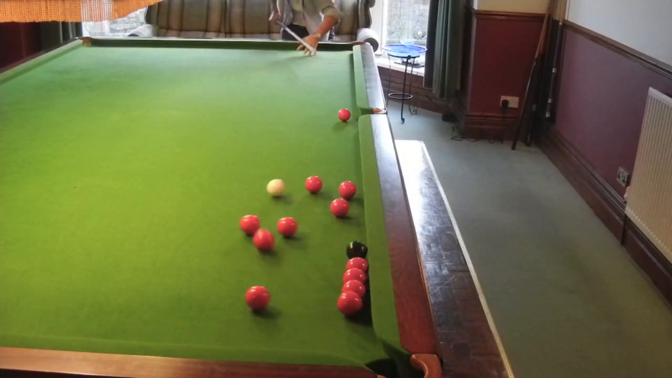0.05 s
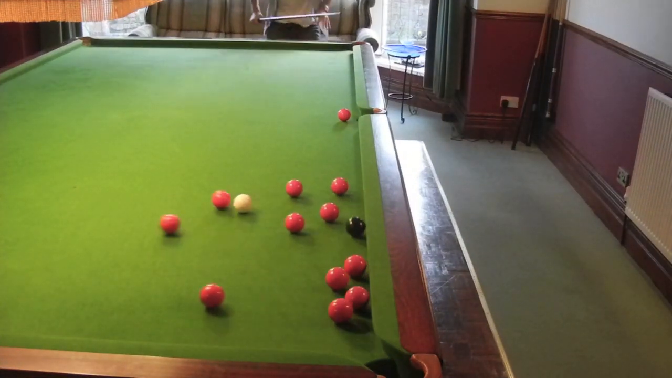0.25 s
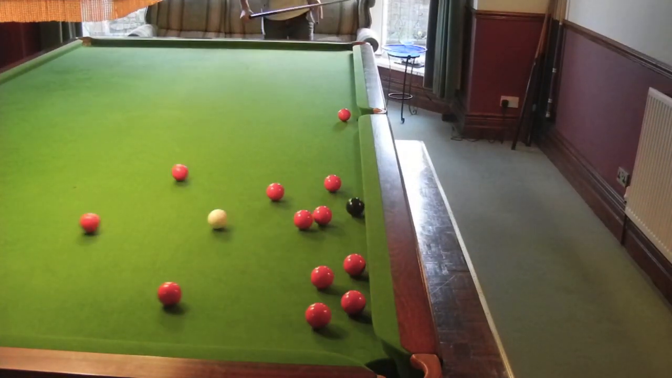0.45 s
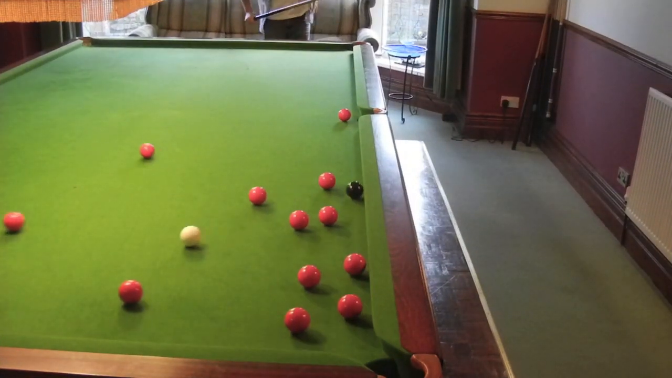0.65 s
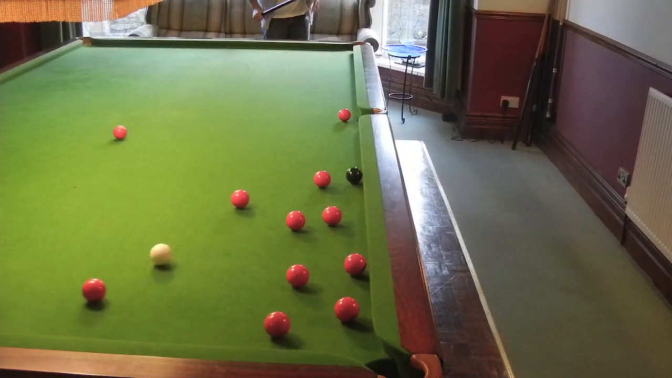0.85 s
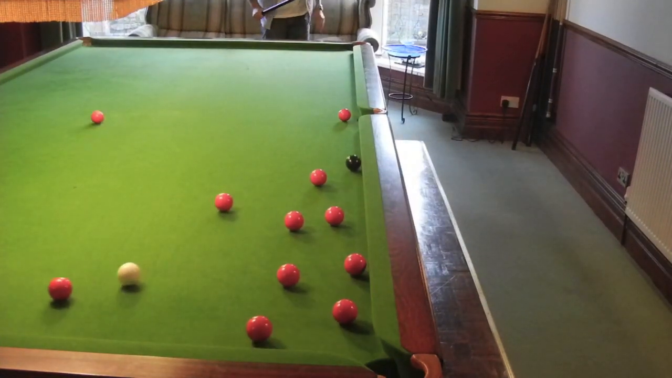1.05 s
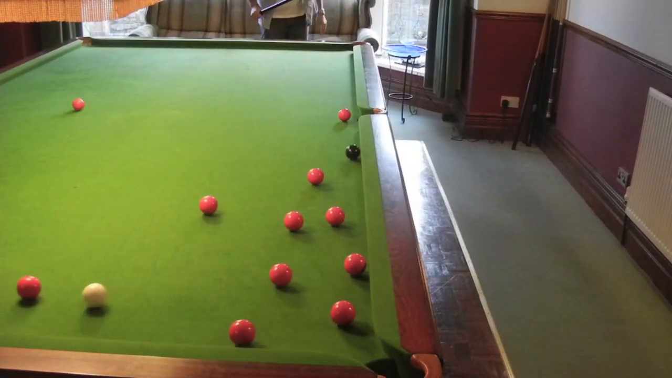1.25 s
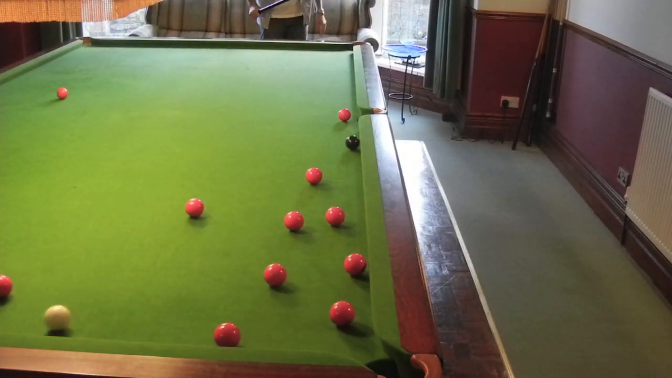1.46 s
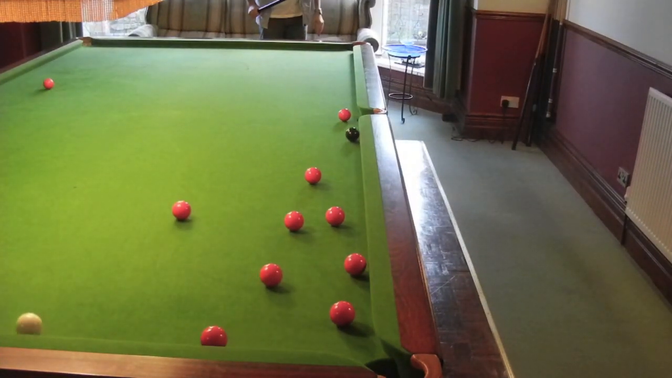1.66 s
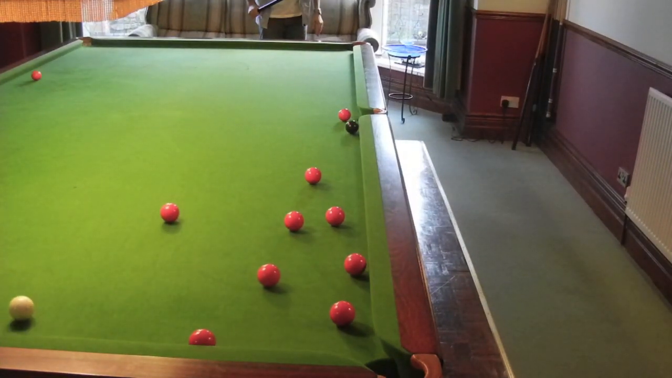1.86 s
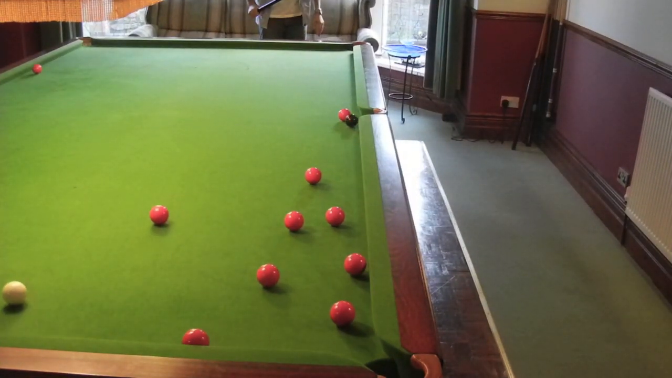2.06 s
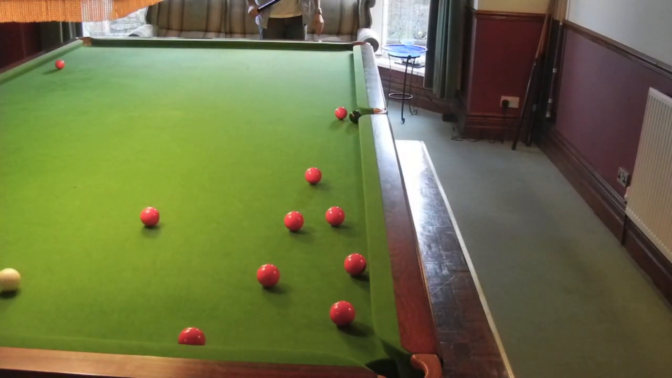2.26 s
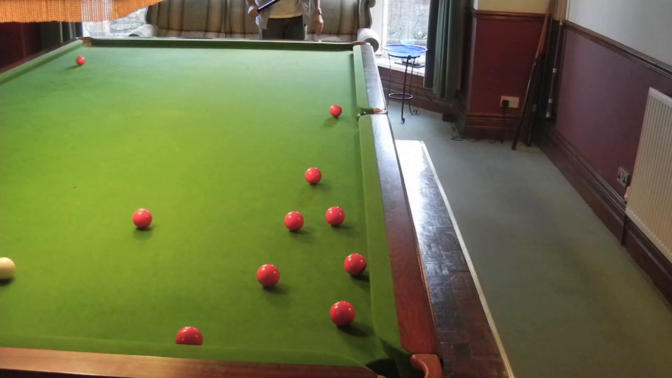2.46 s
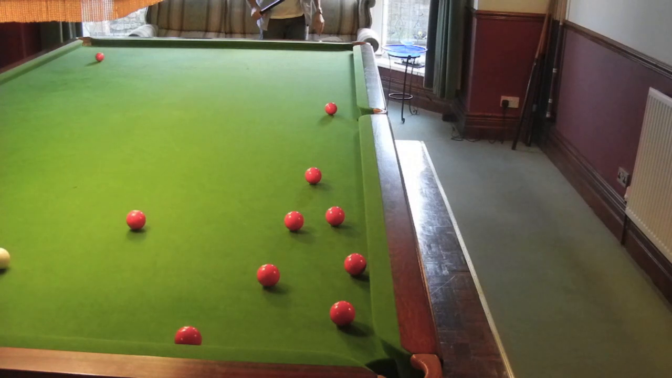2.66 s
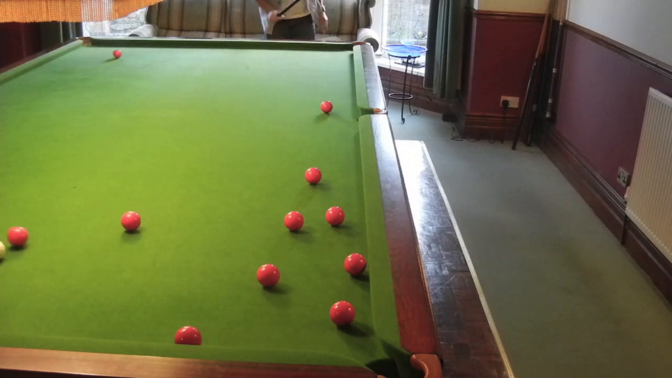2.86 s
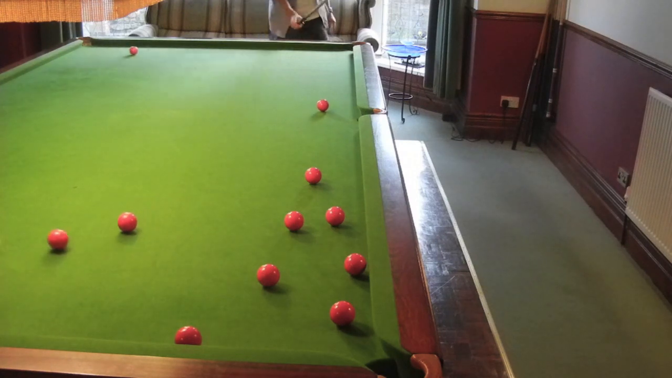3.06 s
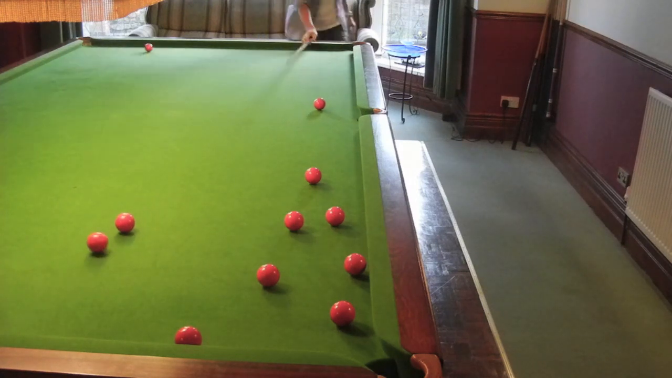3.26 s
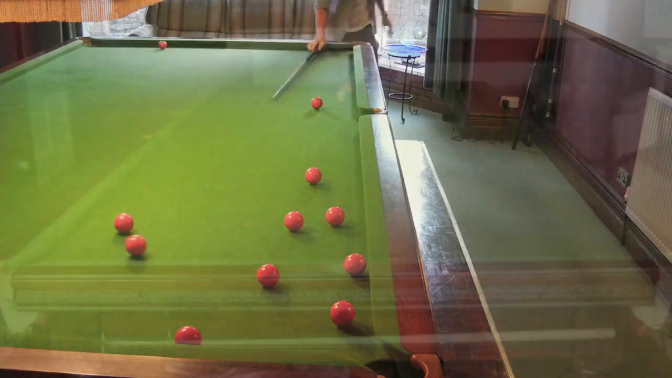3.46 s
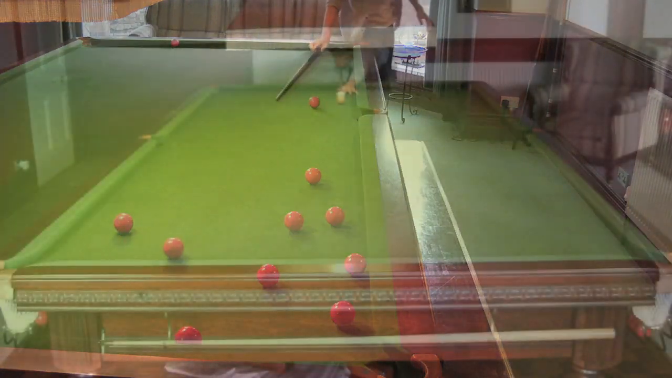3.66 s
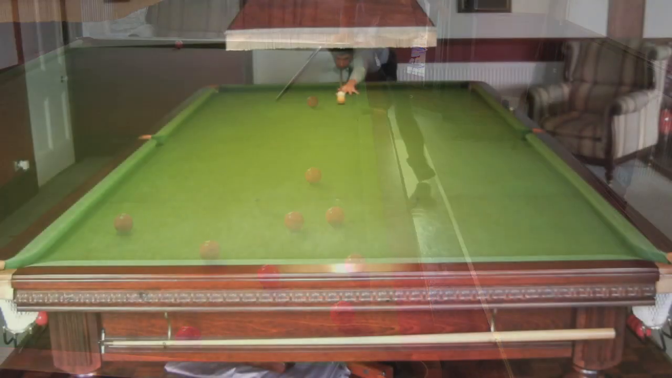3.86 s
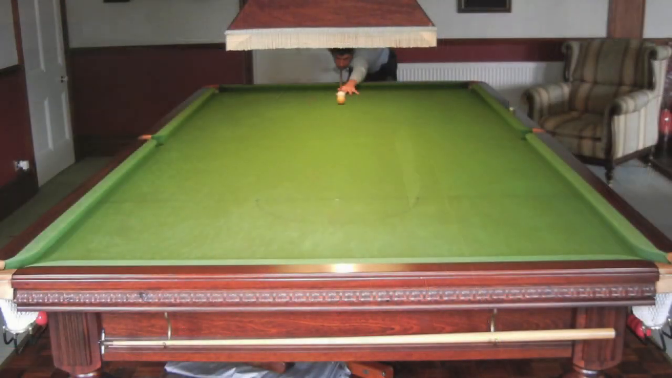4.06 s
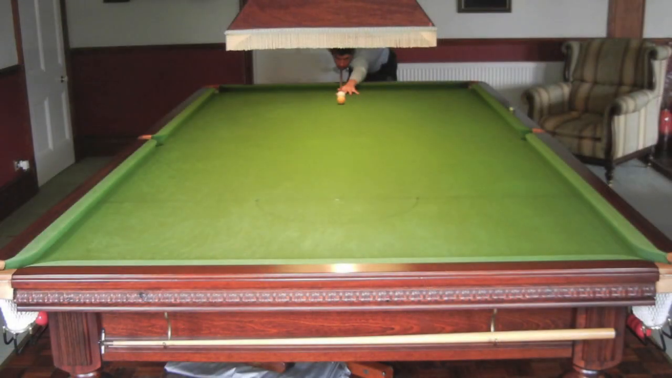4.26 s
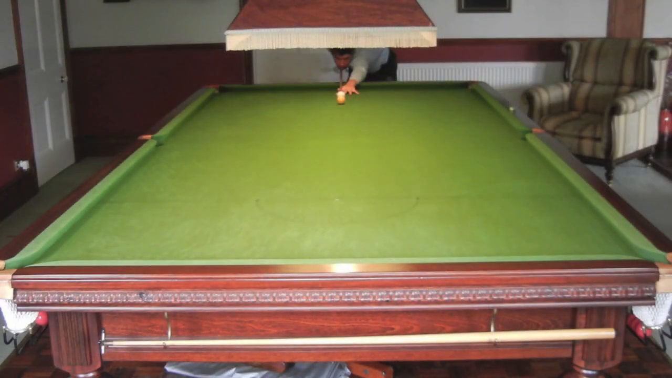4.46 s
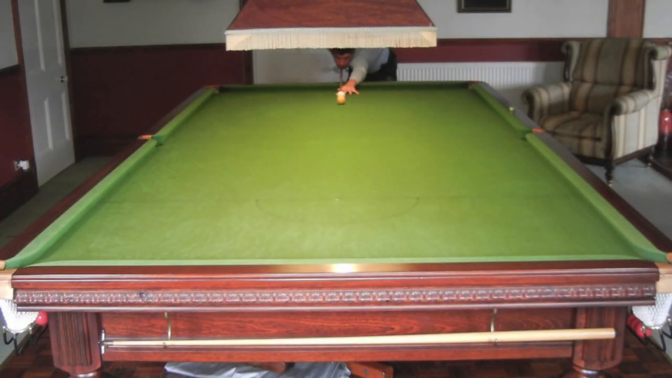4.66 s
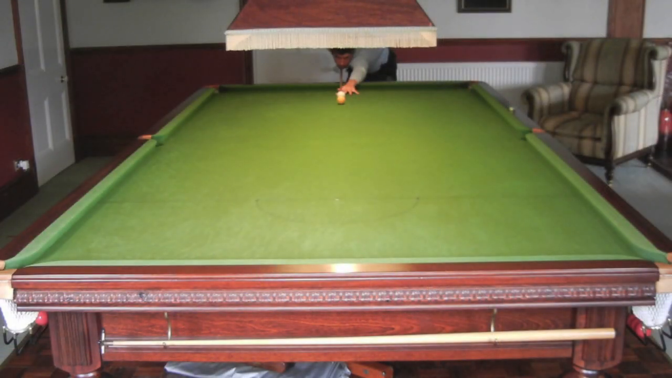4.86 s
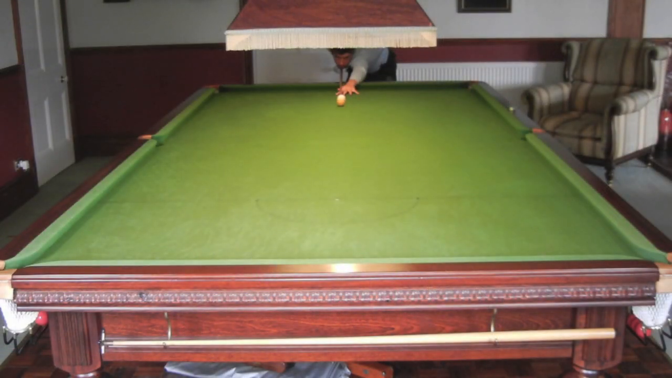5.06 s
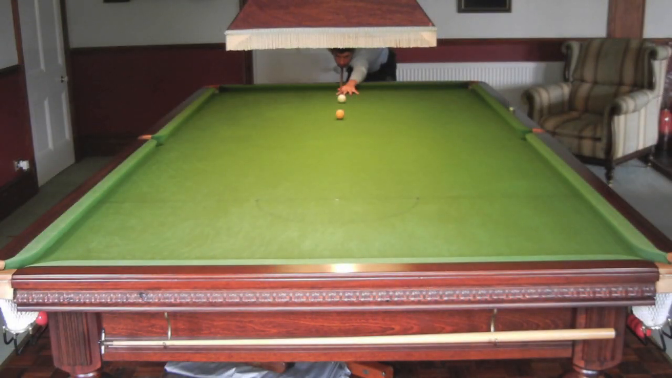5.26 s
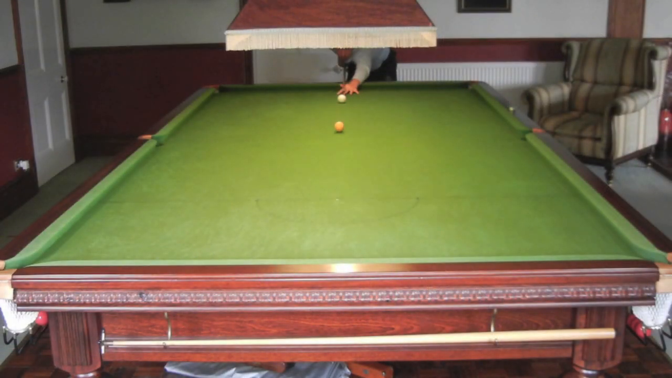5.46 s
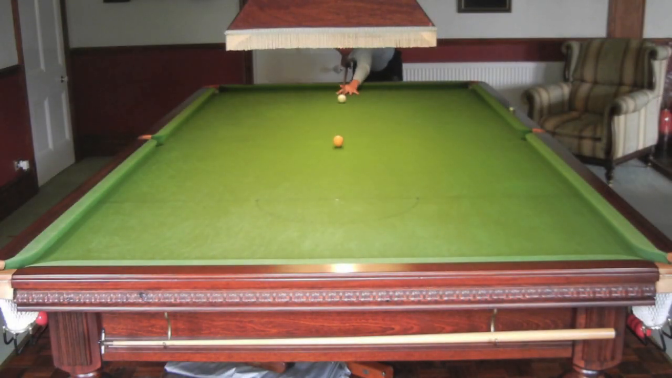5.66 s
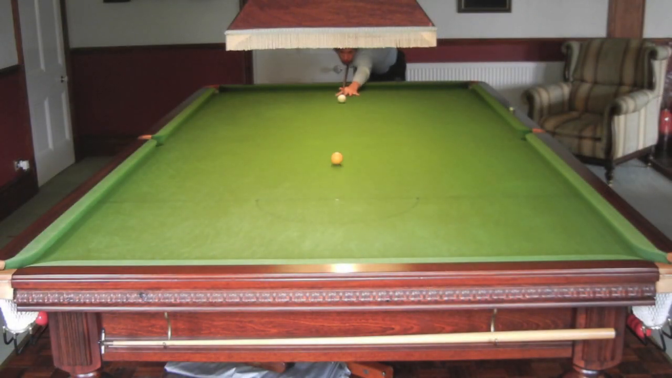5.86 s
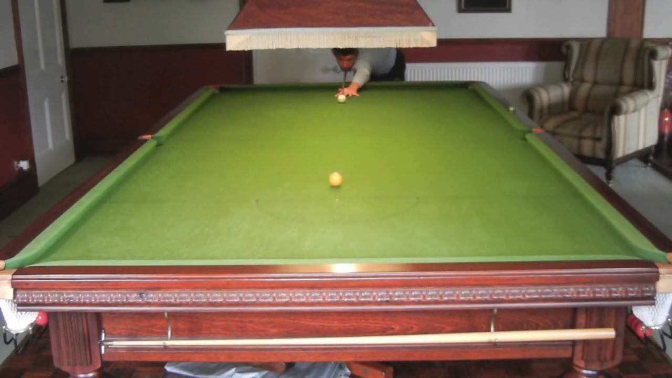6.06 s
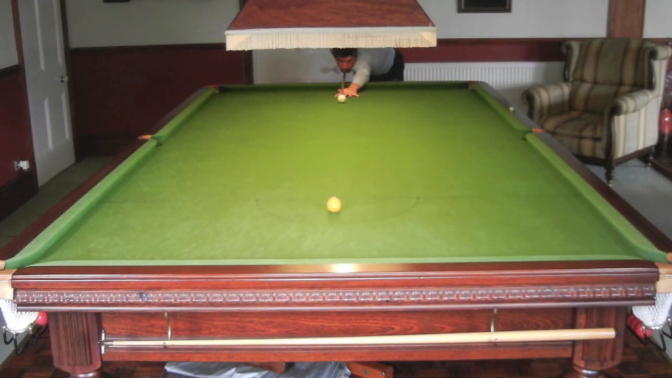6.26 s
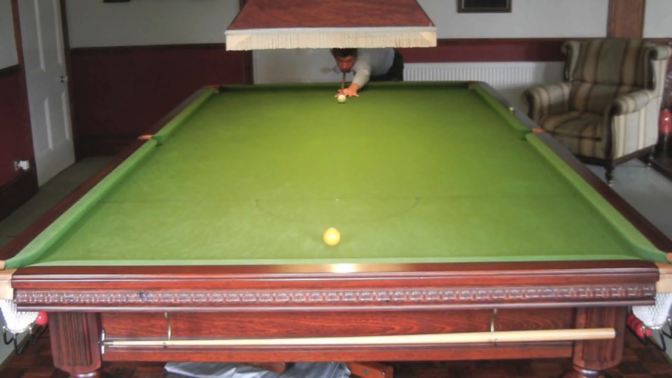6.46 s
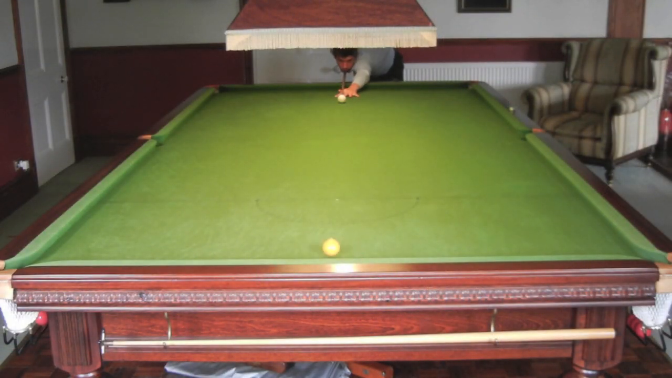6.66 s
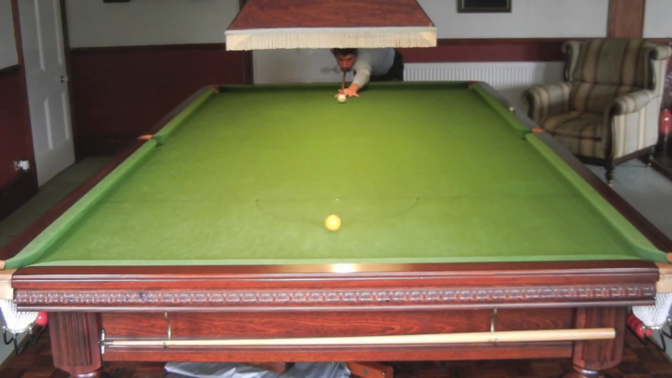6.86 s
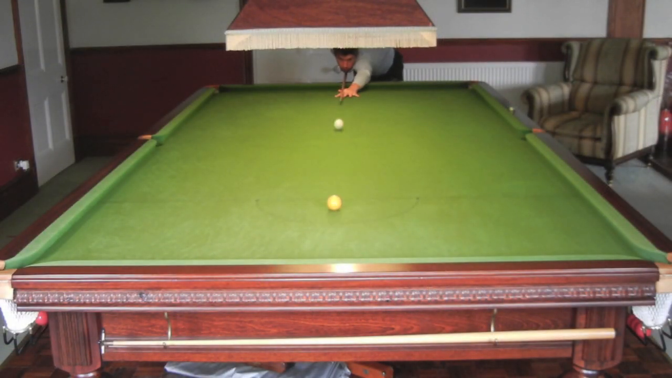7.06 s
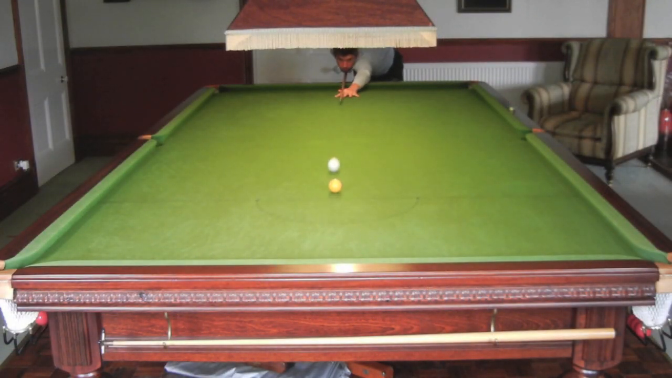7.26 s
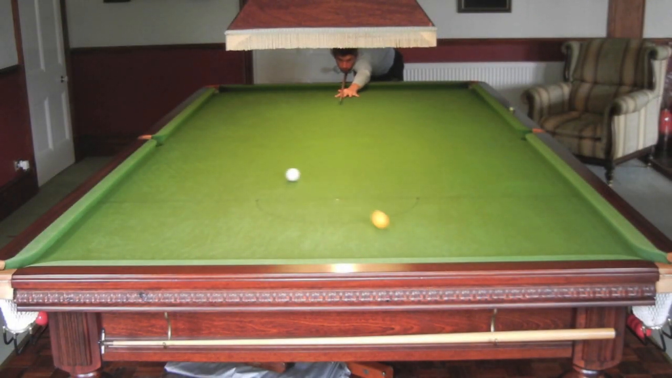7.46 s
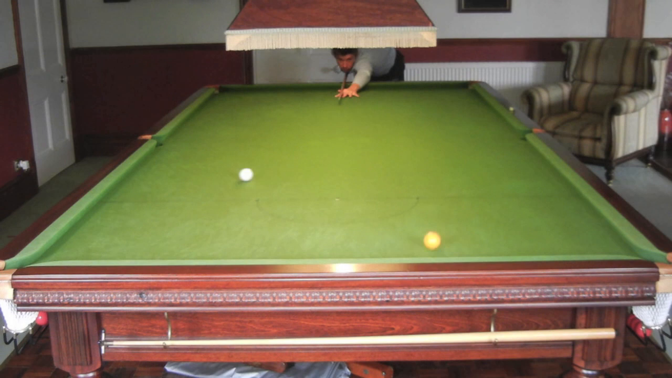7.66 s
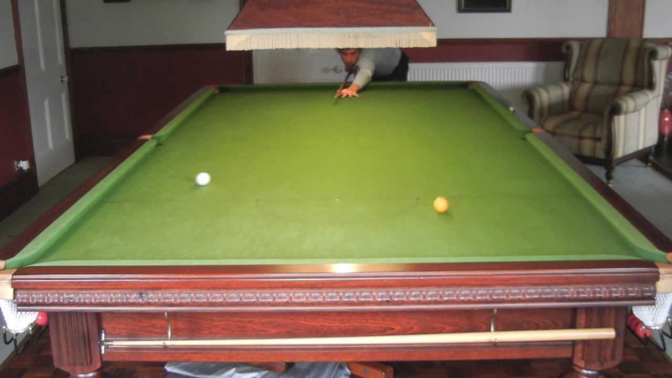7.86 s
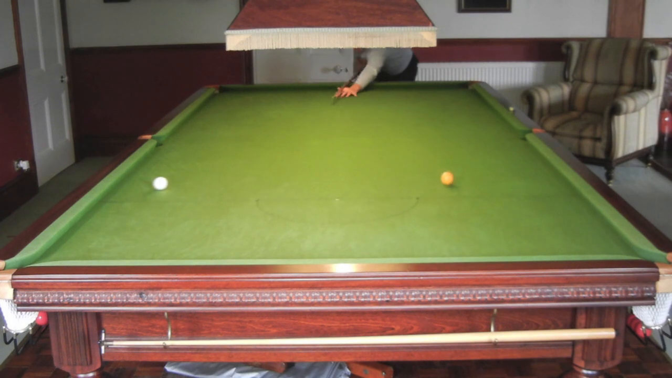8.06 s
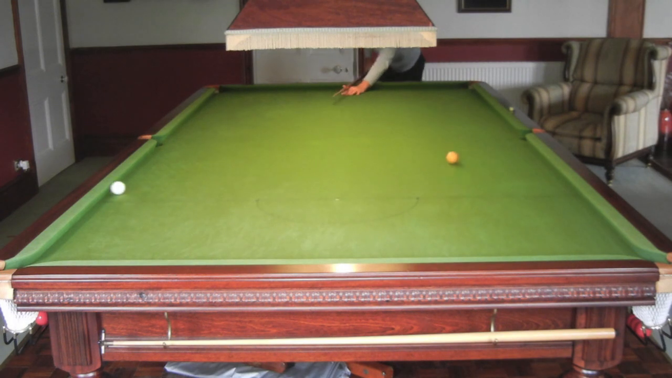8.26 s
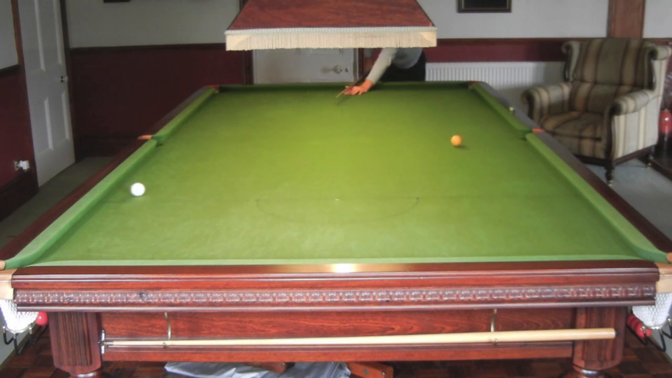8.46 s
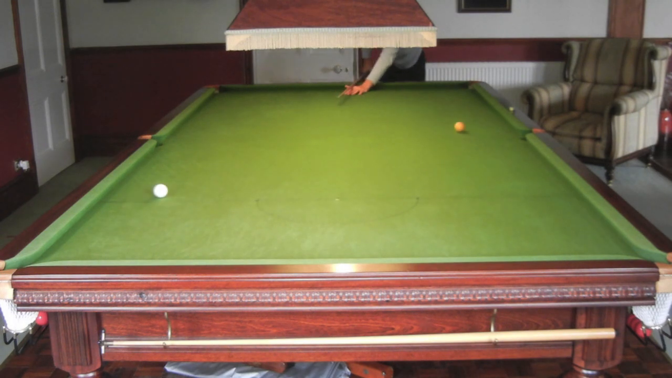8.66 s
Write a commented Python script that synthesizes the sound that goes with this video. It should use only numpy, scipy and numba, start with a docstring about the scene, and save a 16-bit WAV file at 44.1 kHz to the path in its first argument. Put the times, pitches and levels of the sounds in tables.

```python
"""Snooker balls click, roll and thump the cushions in a quiet, fairly live room; two cue shots follow.
Each contact between balls is a sub-millisecond pulse, answered by reflections from table and walls.
Rail, frame and cue shaft ring in damped modes; faint handling ticks and a wooden clack precede the shots.
The room tone passes from that beside the table to that at its end. The hardest clicks overload the
microphone, whose gain control ducks and slowly recovers."""
import sys
import numpy as np
from scipy import signal
from scipy.fft import rfft, irfft, next_fast_len
from scipy.io import wavfile
from numba import njit

SR = 44100
rng = np.random.default_rng(int(sys.argv[2]) if len(sys.argv) > 2 else 0)


def transcribe(signal):
    """Save signal, clipped to [-1, 1], as a 16-bit WAV file at the path in sys.argv[1]."""
    frames = np.atleast_2d(signal).T
    limited = np.clip(frames, -1, 1)
    pcm = np.round(limited * 32767).astype(np.int16)
    wavfile.write(sys.argv[1], SR, pcm)


N = 384552


def amp(db):
    """The decibel law: amplitude grows tenfold every 20 dB."""
    return 10 ** (np.asarray(db) / 20)


def unit_rms(x):
    """Power normalisation to rms 1."""
    return x / np.sqrt(np.mean(x ** 2) + 1e-20)


def unit_blow(x):
    """Energy normalisation to that of 10 ms at rms 1."""
    return x / np.linalg.norm(x) * np.sqrt(SR / 100)


def curve_at(points, hz):
    """Interpolation of (Hz, value) points on a logarithmic frequency axis."""
    freqs, values = np.transpose(points)
    return np.interp(np.log(hz + 1), np.log(freqs), values)


def filtered(x, response):
    """Linear filtering: the spectrum is multiplied by a frequency response."""
    size = next_fast_len(N + SR // 2)
    return irfft(rfft(x, size) * response(np.fft.rfftfreq(size, 1 / SR)), size)[..., :N]


def pulse(spectrum, bright=1, size=4096):
    """Minimum phase: the shortest causal pulse with this spectrum, its frequencies scaled by bright."""
    magnitude = amp(curve_at(spectrum, np.fft.rfftfreq(size, 1 / SR) / bright))
    cepstrum = irfft(np.log(np.maximum(magnitude, 1e-6)))
    cepstrum[1:size // 2] *= 2
    cepstrum[size // 2 + 1:] = 0
    return unit_blow(irfft(np.exp(rfft(cepstrum))))


def burst(spectrum, t60, attack, bright=1):
    """Dense modes merge into coloured noise that decays exponentially; t60 and attack are in seconds."""
    t = np.arange(SR // 2) / SR
    rattle = rng.standard_normal(len(t)) * amp(-60 * t / t60) * (1 - np.exp(-t / attack))
    return unit_blow(signal.fftconvolve(rattle, pulse(spectrum, bright))[:len(t)])


def ring(modes, attack):
    """Modal superposition: damped sinusoids (Hz, dB, t60) build up during the contact."""
    t = np.arange(SR // 2) / SR
    tones = sum(amp(db - 60 * t / t60) * np.sin(2 * np.pi * (hz * t + rng.random()))
                for hz, db, t60 in modes)
    return unit_blow(tones * (1 - np.exp(-t / attack)))


def add(track, start_s, sound):
    """Superposition of a stereo sound on the track; its start may be negative."""
    start = round(start_s * SR)
    part = sound[:, max(-start, 0):N - start]
    track[:, max(start, 0):][:, :part.shape[1]] += part


# Coherence of the noise field. Each row: frequency in Hz, left-right correlation.
COHERENCE = [(60, 0.88), (150, 0.6), (380, 0.5), (950, 0.37), (2380, 0.47), (5980, 0.19), (15000, 0.09)]

def diffuse_noise(spectrum):
    """Spatial coherence: steady noise of rms 1 whose long waves reach both microphones nearly alike."""
    def mid_side_gains(hz):
        angle = np.arccos(np.clip(curve_at(COHERENCE, hz), -1, 1)) / 2
        return amp(curve_at(spectrum, hz)) * [np.cos(angle), np.sin(angle)]
    mid, side = filtered(rng.standard_normal((2, N)), mid_side_gains)
    return unit_rms(np.array([mid + side, mid - side]))


# Decay of the room. Each row: frequency in Hz, reverberation time t60 in seconds.
REVERB_TIMES = [(100, 0.86), (200, 0.89), (500, 0.59), (1200, 0.53), (2400, 0.6), (4000, 0.47),
                (8000, 0.48), (15000, 0.073)]
# Stereo width of the tail at close-set microphones. Each row: frequency in Hz, side over mid in dB.
TAIL_WIDTH = [(250, -17), (2200, -13), (4500, -8), (10000, 1.5)]
# Reflections from cloth, rails and lamp shade. Each row: typical delay in seconds, level in dB.
REFLECTIONS = [(.0013, -17), (.003, -7.5), (.0044, -13.5), (.0066, -14.5), (.0088, -10), (0.0222, -9.5),
               (0.03, -9)]

def in_room(x, room_db, build_s=0.0059):
    """Convolution with direct sound, early reflections and a diffuse tail, drawn anew for each spot."""
    hz, t, noise = signal.stft(rng.standard_normal((2, SR)), SR, nperseg=256)
    noise[1] *= amp(curve_at(TAIL_WIDTH, hz))[:, None]
    envelope = amp(-60 * t / curve_at(REVERB_TIMES, hz)[:, None]) * (1 - np.exp(-t / build_s))
    mid, side = signal.istft(noise * envelope, SR, nperseg=256)[1]
    paths = amp(room_db) * np.array([mid + side, mid - side]) / np.linalg.norm(mid)
    paths[:, 0] += 1  # direct sound
    for delay, db in REFLECTIONS:
        arrival = round(delay * SR * np.exp(.1 * rng.standard_normal()))
        paths[[0, 1], arrival + rng.integers(0, 2, size=2)] += amp(db)  # oblique paths reach one side first
    return signal.fftconvolve(x[None], paths, axes=1)


# Balls set rolling. Each row: start in seconds, length in seconds, level in dB before rise and decay.
ROLLING_BALLS = [(-.2, .9, -42), (1.0, .9, -50.3), (1.9, 1.8, -47.3), (5.62, .5, -46), (6.95, .9, -39),
                 (8.15, .6, -49)]
# Spectrum of the rumble. Each row: frequency in Hz, relative level in dB.
RUMBLE_SPECTRUM = [(29, -52), (50, -11.5), (108, -1), (172, -13), (200, -5.5), (289, -19.5), (495, -7.5),
                   (661, -18.5), (714, -19.5), (1950, -12.5), (5000, -27.5), (6500, -43), (11000, -120)]

def rolling(rise_s=.15, friction_db_per_s=4.5, stop_s=.2):
    """Rolling friction slows the balls, so their rumble on cloth and slate sinks away."""
    envelope = np.zeros(N)
    for start, length, db in ROLLING_BALLS:
        t = np.maximum(np.arange(N) / SR - start, 0)
        stop = np.exp(-np.maximum(t - length, 0) / stop_s)
        envelope += amp(db - friction_db_per_s * t) * (1 - np.exp(-t / rise_s)) * stop
    return envelope * diffuse_noise(RUMBLE_SPECTRUM)


# Ball on ball. Each row: start in seconds, level in dB, reverberant over direct sound in dB.
COLLISIONS = [(-.02, -16, 2.5), (.0795, -11.8, -4.5), (.1105, -25, 9), (.1453, -17, 2), (.169, -24, 6),
              (.2274, -26.5, 11), (.335, -34, 11), (.566, -24.5, 2), (2.022, -55, 13.5),
              (2.2782, -18.5, -4), (5.1493, -2.5, -2), (7.4368, .5, 1.5)]
# Spectrum of a click before brightness scaling. Each row: frequency in Hz, relative level in dB.
CLICK_SPECTRUM = [(210, -46), (350, -19), (550, -22.5), (875, -12), (1290, -6), (1430, -6), (1590, -6.5),
                  (1710, -2), (2410, 0), (2830, -3), (3610, -12), (6500, -66.5), (8450, -79), (14300, -120)]

def ball_clicks(base_bright=1.03, brighter_per_db=.0055):
    """Hertzian contact: resin balls give one pulse, shorter and brighter when they meet faster."""
    out = np.zeros((2, N))
    for start, db, room_db in COLLISIONS:
        force_db = db + room_db  # the reverberant level does not depend on distance
        bright = base_bright * np.exp(brighter_per_db * force_db)
        add(out, start, in_room(amp(db) * pulse(CLICK_SPECTRUM, bright), room_db))
    return out


# Room tone and microphone hiss, beside the table and at its end.
# Each row: frequency in Hz, relative level in dB.
SIDE_AIR_SPECTRUM = [(24, -37.5), (40, -8), (92, -1), (129, -7.5), (182, 1.5), (340, -11), (500, -2),
                     (795, -5), (1010, -4.5), (5000, -18), (6500, -50.5), (11000, -120)]
SIDE_HISS_SPECTRUM = [(2650, -30), (4500, -57.5), (5300, 18), (5730, 15.5), (10500, 13), (11500, 17),
                      (14400, 10.5), (15100, 14), (15800, -6)]
END_AIR_SPECTRUM = [(24, -22), (42, -1), (80, 0), (113, -4), (157, -11), (205, -2.5), (275, -14),
                    (400, -9.5), (490, -5), (740, -10), (970, -7), (1600, -11), (2600, -10.5), (5000, -18),
                    (6500, -36), (11000, -120)]
END_HISS_SPECTRUM = [(2650, -27), (4500, -69.5), (5030, 5), (5950, 7.5), (8540, 6.5), (9790, 11),
                     (11200, 3), (14600, 4), (15800, -12.5)]

def room_tone(side_db=-54.5, side_hiss_db=-61.5, end_db=-53.2, end_hiss_db=-61.0):
    """An equal-power cross-fade carries the background noise from beside the table to its end."""
    t = np.arange(N) / SR
    angle = np.interp(t, [3.35, 4.1], [0, np.pi / 2])
    swell_db = 2.7 * np.exp(-((t - 4.35) / .28) ** 2)  # the room tone swells briefly
    beside = amp(side_db) * diffuse_noise(SIDE_AIR_SPECTRUM)
    beside += amp(side_hiss_db) * diffuse_noise(SIDE_HISS_SPECTRUM)
    at_end = amp(end_db + swell_db) * diffuse_noise(END_AIR_SPECTRUM)
    at_end += amp(end_hiss_db) * diffuse_noise(END_HISS_SPECTRUM)
    return np.cos(angle) * beside + np.sin(angle) * at_end


# Ball on cushion. Each row: start in seconds, thud, knock and boom levels in dB, pitch ratio of the spot.
REBOUNDS = [(.039, -25, -19.5, -20.5, 1.2), (.174, -43, -51, -32, .98), (.654, -42.5, -51, -47, .96),
            (1.636, -42.5, -55, -31, 1.02), (2.131, -47, -37, -34.5, .96), (2.735, -50, -47, -35.5, .9),
            (2.99, -52, -55, -41, 1.04), (3.345, -60, -49, -42.5, .89), (3.443, -45, -41, -54, 1.13),
            (3.66, -43, -52, -41.5, 1.0), (6.704, -30, -31.5, -41, 1.19), (7.713, -25.5, -25.5, -30.5, 1.2),
            (8.148, -50, -44, -61, 1.22), (8.305, -40, -30.5, -43, 1.21)]
# Spectrum of the rubber's thud. Each row: frequency in Hz, relative level in dB.
THUD_SPECTRUM = [(47, -32), (80, -6), (197, -9), (280, -7), (393, 5.5), (421, -17), (492, -4), (983, -14.5),
                 (1170, -14.5), (2300, -21), (5000, -41), (6500, -85.5), (11000, -120)]
# Modes of rail and frame. Each row: frequency in Hz at pitch ratio 1, relative level in dB, t60 in seconds.
RAIL_MODES = [(326, -2, .06), (392, 0, .07), (600, -7, .07)]
FRAME_MODES = [(132, -7, .12), (163, 0, .15), (181, -5, .12)]

def cushions():
    """Compliant rubber prolongs the impact: a dull thud, a knock in the rail, a slower boom in the frame."""
    out = np.zeros((2, N))
    for start, thud_db, knock_db, boom_db, pitch in REBOUNDS:
        at_spot = lambda modes: [(hz * pitch, db, t60) for hz, db, t60 in modes]
        thud = amp(thud_db) * burst(THUD_SPECTRUM, t60=0.13, attack=0.002)
        knock = amp(knock_db) * ring(at_spot(RAIL_MODES), attack=0.003)
        boom = amp(boom_db) * ring(at_spot(FRAME_MODES), attack=0.012)
        add(out, start, in_room(thud + boom + knock, room_db=0.4))
    return out


# Handling near the microphone. Each row: start in seconds, level in dB.
HANDLING = [(2.726, -35.5), (2.763, -37.5), (2.98, -30.5), (3.731, -41.5)]
# Spectrum of a tick. Each row: frequency in Hz, relative level in dB.
TICK_SPECTRUM = [(120, -28), (175, 3), (253, -18.5), (454, 0), (715, -2), (842, -7.5), (2210, -4),
                 (6130, -18.5), (10200, -17), (15500, -20.5)]

def handling_ticks():
    """Heavy damping cuts each light touch down to a short, bright tick."""
    out = np.zeros((2, N))
    for start, db in HANDLING:
        add(out, start, in_room(amp(db) * burst(TICK_SPECTRUM, t60=0.03, attack=0.0097), room_db=-0.5))
    return out


# Modes of knocked wood. Each row: frequency in Hz, bandwidth in Hz at damping 1, relative level in dB.
WOOD_MODES = [(557, 150, 14.5), (1072, 43, -5), (1390, 17, -8), (1567, 51, 3.5), (1864, 32, 0),
              (2284, 27, -3), (2630, 54, -3), (2750, 32, -9), (3250, 32, -24), (3480, 19, -20)]
# Spectrum of the cue's rattle, here and in the shots. Each row: frequency in Hz, relative level in dB.
CUE_SPECTRUM = [(47, -34), (90, -6), (270, -8), (461, 1.5), (930, 1), (1060, -4), (1240, -2), (1610, -5.5),
                (2230, -3), (2970, -7), (3240, -4), (3460, -25), (3780, -12.5), (4600, -18.5), (4910, -18),
                (15000, -46)]

def cue_clack(start_s=3.5415, db=-27.5, damping=1.7, rattle_db=-7):
    """Broad resonances decay fast: a light wooden knock and rattle as the player moves the cue."""
    out = np.zeros((2, N))
    modes = [(hz, level, np.log(1000) / (np.pi * width * damping)) for hz, width, level in WOOD_MODES]
    knock = ring(modes, attack=0.0019)
    rattle = amp(rattle_db) * burst(CUE_SPECTRUM, t60=0.15, attack=0.0026)
    add(out, start_s, in_room(amp(db) * (knock + rattle), room_db=-5))
    return out


# Blows of the cue. Each row: start in seconds, level in dB, ring over knock in dB,
# brightness as a frequency ratio, reverberant over direct sound in dB.
CUE_BLOWS = [(5.0965, -12.2, -7, 0.9, -5.5), (7.0052, -8.2, -9.5, 1.073, -5.5)]
# Modes of the wooden shaft. Each row: frequency in Hz, relative level in dB, t60 in seconds.
SHAFT_MODES = [(724, -9, 0.12), (1056, 1.5, 0.18), (1530, -38, 0.11), (1930, 1, 0.26), (2167, -4, 0.19),
               (2670, 0, 0.32), (3187, 1.5, 0.38), (3283, -0.5, .65), (3290, -5.5, 0.5), (3700, -1, 0.17),
               (4357, -6.5, 0.26), (4860, -7, 0.36), (6062, -14, .22), (6433, -18, 0.53), (6831, -13, .22),
               (7940, -14, .2)]

def cue_shots():
    """Impact excites free vibration: the tip's knock swells off table and walls, and the shaft rings on."""
    out = np.zeros((2, N))
    for start, db, ring_db, bright, room_db in CUE_BLOWS:
        knock = burst(CUE_SPECTRUM, t60=0.22, attack=0.0048, bright=bright)
        shaft = amp(ring_db) * ring(SHAFT_MODES, attack=0.00083)
        add(out, start, in_room(amp(db) * (knock + shaft), room_db))
    return out


# Room response at the listening position. Each row: frequency in Hz, relative level in dB.
POSITION_RESPONSE = [(110, 1), (198, 2), (240, 1), (295, -4.5), (380, 0), (500, 0.5), (760, -1), (1050, 0),
                     (1600, 1)]

def standing_waves(x):
    """Interference in the room lifts some low notes and thins others; the treble passes unchanged."""
    response = pulse(POSITION_RESPONSE)
    treble_gain = abs(rfft(response)[-1])
    return signal.fftconvolve(x, response[None] / treble_gain, axes=1)[:, :N]


def scene():
    """A level difference between the channels sets the table slightly to the right, amid the room tone."""
    impacts = standing_waves(ball_clicks() + cue_shots() + cue_clack() + cushions() + handling_ticks())
    return (impacts + rolling()) * amp([[-.55], [.55]]) + room_tone()


@njit
def follow_peak(level, rise, fall):
    """Peak detection: the held level charges fast and drains slowly."""
    held, out = 0.0, np.empty(len(level))
    for i in range(len(level)):
        held = held + rise * (level[i] - held) if level[i] > held else held * fall
        out[i] = held
    return out


def pole(seconds):
    """Exponential relaxation: the fraction left after one sample, given the time constant."""
    return np.exp(-1 / (seconds * SR))


def record(dry, threshold_db=-4, delay_s=.0048, release_db_per_s=55, ceiling=.95, clip_level=0.9,
           hiss_db=-58.5, low_cut_hz=48, top_hz=15850):
    """Overload: a peak saturates, a fast limiter catches it, then gain control ducks and slowly recovers."""
    held = follow_peak(np.abs(dry).max(0), 1 - pole(0.00019), float(amp(-release_db_per_s / SR)))
    excess_db = np.maximum(20 * np.log10(held + 1e-9) - threshold_db, 0)
    late_db = np.interp(np.arange(N) - delay_s * SR, np.arange(N), excess_db)
    lag = pole(0.00075)
    ducked = dry * amp(-signal.lfilter([1 - lag], [1, -lag], late_db))
    peak = follow_peak(np.abs(ducked).max(0), 1 - pole(.0004), pole(.004))
    limited = ducked / np.maximum(peak / ceiling, 1)
    saturated = limited / (1 + np.abs(limited / clip_level) ** 8) ** (1 / 8)
    low_cut = signal.butter(2, low_cut_hz, "highpass", fs=SR, output="sos")
    hiss = amp(hiss_db) * rng.standard_normal((2, N))
    return filtered(signal.sosfilt(low_cut, saturated) + hiss, lambda hz: hz < top_hz)


dry = scene()
out = record(dry)
transcribe(out)
```